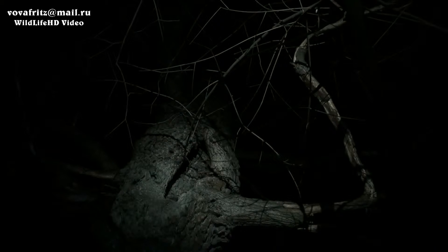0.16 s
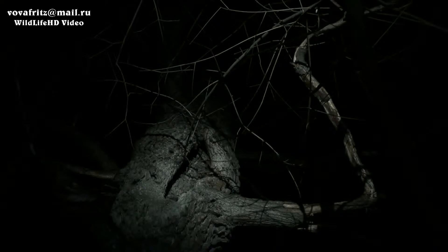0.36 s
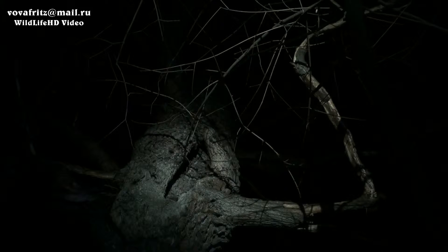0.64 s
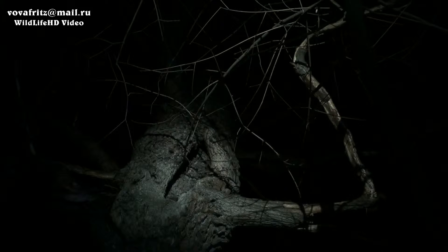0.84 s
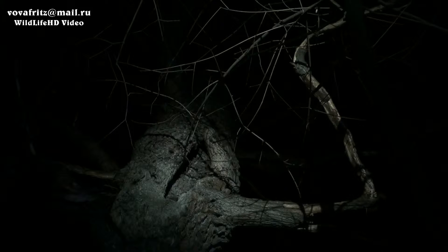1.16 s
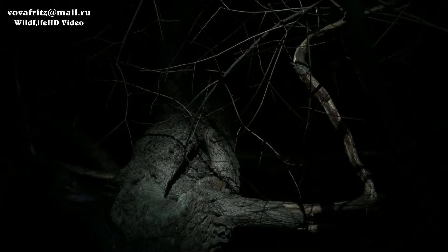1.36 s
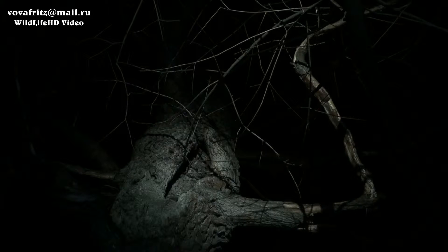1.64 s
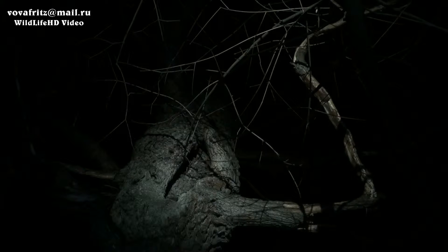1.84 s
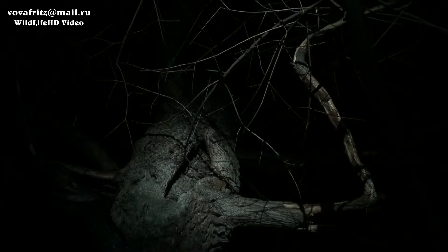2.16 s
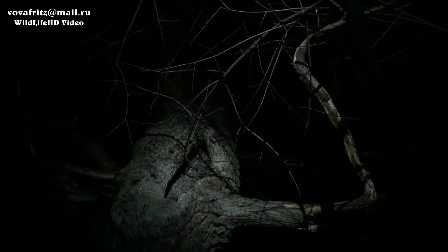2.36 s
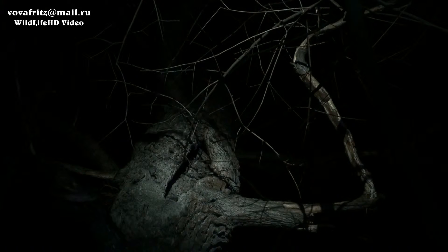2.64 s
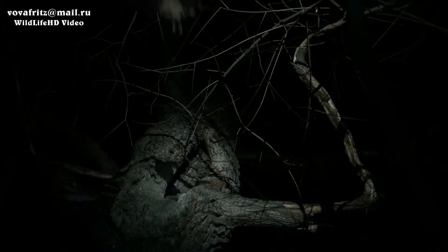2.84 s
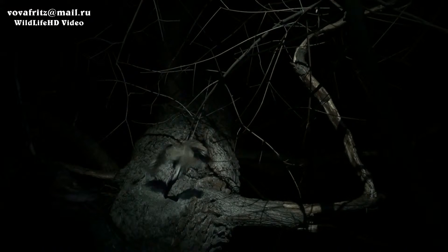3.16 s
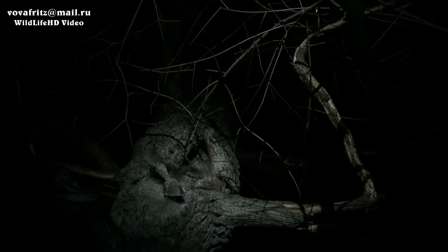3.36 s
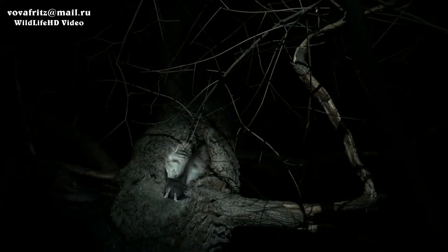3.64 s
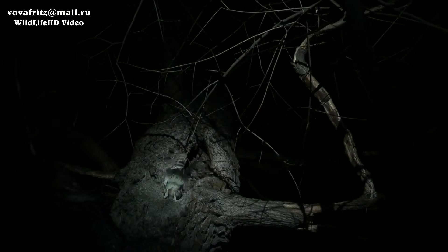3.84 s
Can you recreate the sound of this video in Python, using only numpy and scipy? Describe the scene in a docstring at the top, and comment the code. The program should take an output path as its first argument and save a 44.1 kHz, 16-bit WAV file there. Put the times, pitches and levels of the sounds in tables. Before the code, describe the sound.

Owl call, nasal and raspy, with thin high squeaks from a young bird in quiet night woods

```python
"""An adult owl calls reedily from the left in a wood at night: a harmonic stack coloured by throat and beak.
A young bird answers in high, hoarse squeaks: gliding whistles with rasp, an octave below and a wheeze.
Twigs tick as decaying noise; distant traffic hum and microphone hiss, shaped noise, lie under all.
Scattering from the trees follows birds and twigs. The sound fades in after a silent third of a second."""
import sys
import numpy as np
from scipy import signal
from scipy.fft import rfft, irfft, next_fast_len
from scipy.io import wavfile
from scipy.ndimage import uniform_filter1d, map_coordinates

SR = 44100
rng = np.random.default_rng(int(sys.argv[2]) if len(sys.argv) > 2 else 0)


def persist_wave(psi):
    """Save psi, clipped to +-1, as 16-bit WAV."""
    counts = np.round(np.clip(psi, -1, 1) * 32767).astype(np.int16)
    wavfile.write(sys.argv[1], SR, np.atleast_2d(counts).T)


def amplitude_ratio(level_db):
    """Convert a level in decibels to the matching linear amplitude (field) ratio."""
    exponent = np.asarray(level_db, float) / 20
    return 10 ** exponent


N = 176400

# Owl calls before placing:
# (time [s], pitch [Hz], fundamental level [dB], overtone gain [dB], hoarseness [0-1])
OWL_FAR = [(.39, 973, -59, -80, 0.78), (.43, 1005, -55.5, -71, 0.8), (.5, 1050, -55, -64, 0.65),
           (.512, 1160, -51, -58, 0.08), (.58, 1330, -56.5, -60, .1), (.6, 1140, -54, -54, 0),
           (.611, 1127, -55, -55.5, 0)]
OWL_NEAR = [(2.472, 1247, -50, -52, 0.15), (2.477, 1150, -49, -48.5, 0.05), (2.487, 1223, -52, -50.5, 0.1),
            (2.496, 1171, -45, -60, 0.44), (2.501, 1017, -49.5, -53, 0.12), (2.552, 912.5, -48, -58, 0.23),
            (2.58, 953.5, -48.5, -55.5, 0.53), (2.62, 1006, -48, -52, 0.8), (2.651, 1144, -43, -49, 0.72),
            (2.657, 1067, -43, -43.5, 0.15), (2.667, 1139, -41, -42, 0.059),
            (2.671, 1221, -34.5, -42.5, 0.096), (2.679, 1272, -44, -39.5, 0.011),
            (2.711, 1322, -43, -40.5, 0.0065), (2.729, 1274, -39.5, -41.5, 0.065),
            (2.737, 1225, -43, -39.5, 0.14), (2.741, 1156, -44, -48, 0.1), (2.75, 1113, -38.5, -42, 0.048),
            (2.758, 1081, -53, -48.5, 0.2), (2.762, 1204, -42, -44.5, 0.19), (2.77, 1169, -44, -47.5, 0.18),
            (2.779, 1123, -47, -61, 0.35)]
OWL_LAST = [(3.8, 1021, -56.5, -72, 0.94), (3.9, 919, -56.5, -70, 1), (4, 960, -58.5, -82, 0.9)]
# Resonances with the beak nearly shut, and wide open: (frequency [Hz], gain [dB])
BEAK_SHUT = [(1900, -6), (2500, -10), (3500, 4), (4200, -13.5), (5200, -14), (7000, -2.5), (8300, -7),
             (9500, -22)]
BEAK_OPEN = [(2300, -3.5), (3900, 0.5), (4600, -10), (5300, -5.5), (6600, -7.5), (8000, -17.5),
             (9500, -27.5), (14000, -38)]
# Squeaks of the young bird before placing: (time [s], pitch [Hz], whistle level [dB], hoarseness [0-1])
SQUEAKS = [
    [(.833, 6500, -70, .9), (.855, 6800, -75, .9)],
    [(.99, 7530, -71, .5), (1.045, 7350, -70, .6), (1.17, 7100, -78, .9)],
    [(1.815, 5390, -67, .9), (1.83, 6420, -68.5, 1), (1.9, 7100, -72, .9), (1.92, 6780, -55, .15),
     (1.943, 5830, -51, 0.16), (1.952, 5600, -68, .9), (1.99, 5100, -64, .9), (2.018, 5870, -54, .4),
     (2.055, 7010, -57.5, 0.2), (2.075, 7340, -55.5, 0.4), (2.092, 6300, -57, 0.4), (2.105, 6950, -60, .8),
     (2.2, 6800, -69, 0.7), (2.27, 6870, -73, .7)],
    [(3.337, 6200, -69, 1), (3.346, 6720, -56, 0.4), (3.358, 7350, -70, .4), (3.425, 7400, -67, .3),
     (3.449, 6650, -57, .3), (3.478, 5850, -60, 0.4), (3.51, 5400, -64, 0.8), (3.54, 5850, -58, 0.4),
     (3.56, 6320, -56.5, .2), (3.58, 6884, -53, .2), (3.598, 6880, -52.5, 0), (3.62, 6850, -65, .1),
     (3.69, 6860, -75, .2)],
]
# Breath colour of the young bird: (frequency [Hz], gain [dB])
WHEEZE = [(2000, -32), (3200, -3.5), (4500, -9), (5800, -5), (6300, -6), (6900, -0.5), (8300, -30)]
# Twig snaps before placing: (time [s], rms level at onset [dB])
TICKS = [(2.984, -57), (3.731, -62), (3.808, -59)]
# Colour of a snap: (frequency [Hz], gain [dB])
TWIG = [(800, -20), (5000, 1), (14000, -15)]
# Decay of the scattering from the trees: (frequency [Hz], 60 dB decay time [s])
ECHO = [(500, 0.49), (9000, 0.41)]
# Relative spectrum of hum and hiss: (frequency [Hz], density [dB per Hz])
NIGHT = [(12, -36), (20, -0.5), (38, -1.5), (59, -14.5), (98, -0.5), (133, -15.5), (157, -10.5),
         (186, -15.5), (213, -13.5), (859, -14.5), (1200, -18), (3010, -31.5), (9000, -41), (15600, -44.5)]
# Likeness of the background at the two microphones: (frequency [Hz], correlation [-1 to 1])
ALIKE = [(30, 0.9), (120, 0.87), (240, 0.63), (480, 0.6), (950, -0.0063), (5000, -0.2)]
# Background balance: (frequency [Hz], left over right [dB])
LEFT_DB = [(30, 2.5), (90, -1.5), (200, 0.5), (700, 2), (1500, 0), (8000, -1)]

JITTER, SHIMMER_DB = 0.0031, 0.56  # rms pitch (relative) and level wander of a clear, open-beaked voice
OPENS_DB = 7.5  # overtone gain over which the beak goes from shut to open
LOW_VOICE_HZ, SHINE_HZ, SHINE_DB = 1180, 6300, 7.5  # below this pitch the open beak rings brighter in the treble
FLUTTER_HZ, FLUTTER_DB = 167.5, 4  # centre rate and peak depth of the throb when fully hoarse
BREATH_DB = -6  # gain of the breath against the overtones when fully hoarse
RASP_HZ, UNDERTONE_DB = 401, -11.5  # half width of the hoarse band; gain of the octave below
WHEEZE_DB = -3.5  # against the smoothed whistle level
TRUNK_S, TRUNK_DB = 0.018, -12  # delay and gain of one distinct reflection
TICK_T60_S = 0.05
NIGHT_DB = -48.5  # rms of the part common to both microphones, before the balance
FADE_START_S, FADE_S = 0.331, 0.036
STEREO_TOP_HZ = 11300


def owl(rows, dull_db):
    """Source-filter principle: the beak's resonances weight overtones, duller by dull_db an octave."""
    gate, hz, low_db, high_db, hoarse = controls(rows, edge_s=0.0035)
    hoarse = np.clip(hoarse, 0, 1)
    # The beak opens over the loudest part of each call.
    gape = np.clip(1.5 + (high_db - high_db.max()) / OPENS_DB, 0, 1)
    jitter = JITTER * (1 + 2 * hoarse) * wobble(150)
    phase = 2 * np.pi * np.cumsum(hz * (1 + jitter)) / SR

    def line(k, share):
        """Amplitude modulation: hoarseness smears a line; a closing beak makes overtones flicker more."""
        smear = np.sqrt(1 - share) + np.sqrt(share) * wobble(1200)
        shimmer_db = SHIMMER_DB * (1 + (k > 1) * 2 * (1 - gape)) * wobble(70)
        return np.sin(k * phase) * smear * amplitude_ratio(shimmer_db)

    def overtone(k):
        """Resonance: the gain of harmonic k follows its frequency and the beak's opening."""
        f = k * hz
        colour_db = (1 - gape) * along(BEAK_SHUT, f) + gape * along(BEAK_OPEN, f)
        treble = np.clip((f / SHINE_HZ - 1) * 10, 0, 1)
        shine_db = SHINE_DB * gape * (hz < LOW_VOICE_HZ) * treble
        return amplitude_ratio(colour_db + shine_db - dull_db * np.log2(k / 3.34)) * line(k, hoarse)

    # A hoarse voice throbs, all overtones together.
    throb_phase = 2 * np.pi * np.cumsum(FLUTTER_HZ * amplitude_ratio(2 * wobble(40))) / SR
    throb = amplitude_ratio(FLUTTER_DB * hoarse * np.sin(throb_phase))
    overtones = sum(overtone(k) for k in range(2, 13))
    breath = amplitude_ratio(BREATH_DB) * np.sqrt(hoarse) * hiss([(1000, -38)] + BEAK_SHUT)
    # The lowest line lies 1 % under the tabled pitch.
    fundamental = np.sqrt(2) * amplitude_ratio(low_db) * line(0.99, 0.5 * hoarse ** 2)
    return gate * (fundamental + amplitude_ratio(high_db) * throb * (overtones + breath))


def squeak(rows):
    """Frequency modulation: a gliding whistle, blurred by noise, over its subharmonic and a wheeze."""
    gate, hz, level_db, hoarse = controls(rows, edge_s=0.0098)
    hoarse = np.clip(hoarse, 0, 1)
    phase = 2 * np.pi * np.cumsum(hz * (1 + 0.0022 * wobble(120))) / SR
    rasp = np.sqrt(1 - hoarse) + np.sqrt(hoarse) * wobble(2 * RASP_HZ)
    whistle = np.sin(phase) * rasp
    undertone = amplitude_ratio(UNDERTONE_DB) * np.sqrt(hoarse) * np.sin(phase / 2) * wobble(RASP_HZ)
    wheeze = amplitude_ratio(WHEEZE_DB + uniform_filter1d(level_db, SR // 20)) * hiss(WHEEZE)
    voice = np.sqrt(2) * amplitude_ratio(level_db + 1.05 * wobble(60)) * (whistle + undertone)
    return gate * (voice + wheeze)


def twigs():
    """Impulsive excitation: each snap is coloured noise with an abrupt onset and exponential decay."""
    t = np.arange(N) / SR
    envelope = sum((t > s) * amplitude_ratio(db - 60 * np.abs(t - s) / TICK_T60_S) for s, db in TICKS)
    return hiss(TWIG) * envelope


def placed(x, left_db, lead_s, echo_db):
    """Two-microphone localisation by level and time difference, plus diffuse scattering from the trees."""
    half = np.array([[0.5], [-0.5]])  # left, right
    direct = filtered(x, lambda hz: amplitude_ratio(left_db * half) * np.exp(2j * np.pi * hz * half * lead_s))
    hz, t, z = signal.stft(rng.standard_normal((2, SR // 2)), SR, nperseg=256)
    decay = amplitude_ratio(-60 * t / along(ECHO, hz)[:, None])
    tail = signal.istft(z * decay, SR, nperseg=256)[1]
    tail = tail / np.linalg.norm(tail[0])
    delayed = np.pad(x, (400, 0))[None]  # 9 ms
    wet = signal.fftconvolve(delayed, tail, axes=1)[:, :N]
    return direct + amplitude_ratio(echo_db) * wet


def night():
    """Spatial coherence: slightly patchy hum and hiss, alike in the bass, unrelated in the treble."""
    z = signal.stft(rng.standard_normal((2, N)), nperseg=512)[2]
    patches = rng.standard_normal(z.shape[1:])
    patches = uniform_filter1d(uniform_filter1d(patches, 6, 0), 12, 1)
    pair = signal.istft(z * amplitude_ratio(0.78 * unit(patches)), nperseg=512)[1][:, :N]

    def mid_side(hz):
        """Correlation fixes the angle whose tangent is the side-to-mid ratio."""
        angle = np.arccos(np.clip(along(ALIKE, hz), -1, 1)) / 2
        return amplitude_ratio(along(NIGHT, hz)) * np.array([np.ones_like(hz), np.tan(angle)])

    mid, side = filtered(pair, mid_side)
    both = np.array([mid + side, mid - side]) / np.std(mid)
    both = filtered(both, lambda hz: amplitude_ratio(along(LEFT_DB, hz) * np.array([[0.5], [-0.5]])))
    return amplitude_ratio(NIGHT_DB) * both


def hiss(colour):
    """Spectral shaping: white noise takes on a colour, at rms 1."""
    return unit(filtered(rng.standard_normal(N), lambda hz: amplitude_ratio(along(colour, hz))))


def controls(rows, edge_s):
    """Linear interpolation: a gate with soft edges, then one curve for each column after time."""
    s, *cols = np.transpose(rows)
    t = np.arange(N) / SR
    to_edge = np.minimum(t - s[0] + edge_s, s[-1] + edge_s - t)
    gate = np.clip(to_edge / edge_s, 0, 1)
    return [gate] + [np.interp(t, s, c) for c in cols]


def wobble(rate):
    """Band-limited randomness: a smooth curve of rms 1 through random knots, rate of them a second."""
    knots = rng.standard_normal(int(N * rate / SR) + 4)
    return unit(map_coordinates(knots, [np.arange(N) * rate / SR]))


def filtered(x, response):
    """Linear filtering: multiplies the spectrum by a response of frequency."""
    m = next_fast_len(N + 8192)
    return irfft(rfft(x, m) * response(np.fft.rfftfreq(m, 1 / SR)), m)[..., :N]


def along(points, hz):
    """Logarithmic frequency scale: interpolates (frequency [Hz], value) points along it."""
    f, v = np.transpose(points)
    return np.interp(np.log(hz + 1), np.log(f + 1), v)


def unit(x):
    """Power normalisation: scales a signal to rms 1."""
    return x / np.sqrt(np.mean(x ** 2) + 1e-20)


def scene():
    """Superposition: the placed birds and twigs add to the night background."""
    adult = owl(OWL_FAR, dull_db=7) + owl(OWL_NEAR, dull_db=2) + owl(OWL_LAST, dull_db=7)
    young = sum(squeak(rows) for rows in SQUEAKS)
    young = young + amplitude_ratio(TRUNK_DB) * np.pad(young, (round(TRUNK_S * SR), 0))[:N]
    return (placed(adult, left_db=4.5, lead_s=2.2e-5, echo_db=-10.5)
            + placed(young, left_db=0.5, lead_s=-1e-5, echo_db=-2)
            + placed(twigs(), left_db=-9, lead_s=0, echo_db=1)
            + night())


def band_limit(x):
    """A steep low-pass at the top of the band."""
    return signal.sosfilt(signal.butter(12, 15710, fs=SR, output="sos"), x)


def record(dry):
    """Mid-side decomposition: the top treble is kept in mono, under a squared fade-in."""
    ramp = np.clip((np.arange(N) / SR - FADE_START_S) / FADE_S, 0, 1)
    mid = dry.mean(axis=0)
    side = filtered(dry - mid, lambda hz: hz < STEREO_TOP_HZ)
    mix = (mid + side) * ramp ** 2
    return band_limit(mix)


dry = scene()
out = record(dry)
persist_wave(out)
```